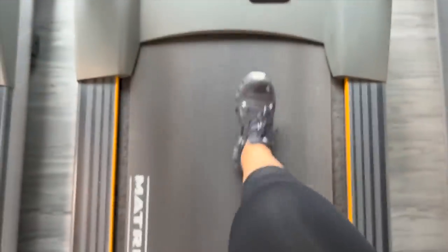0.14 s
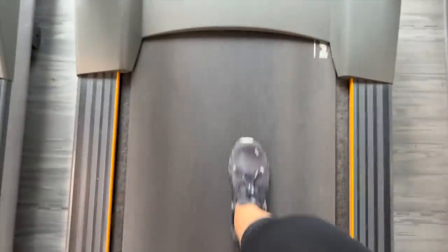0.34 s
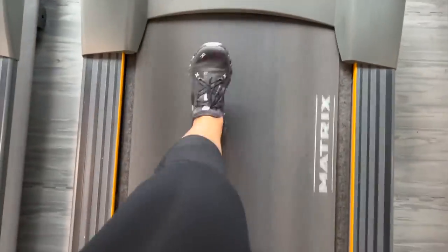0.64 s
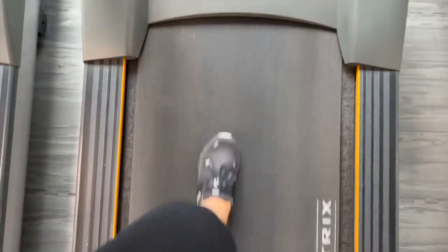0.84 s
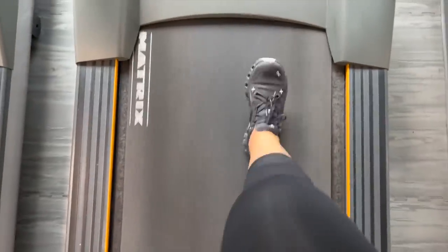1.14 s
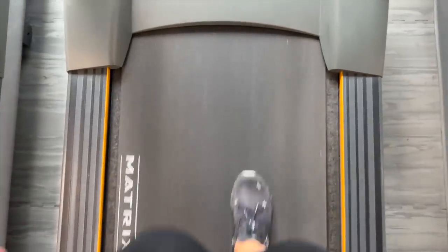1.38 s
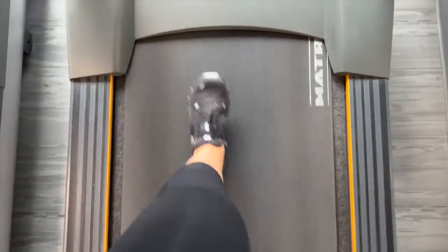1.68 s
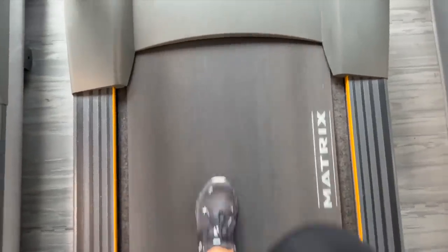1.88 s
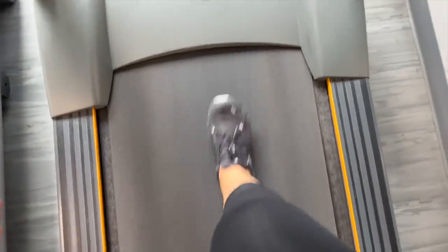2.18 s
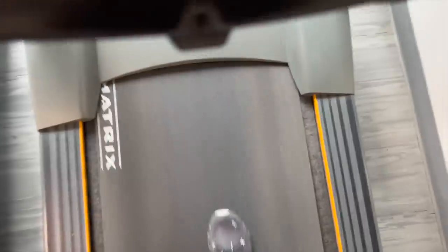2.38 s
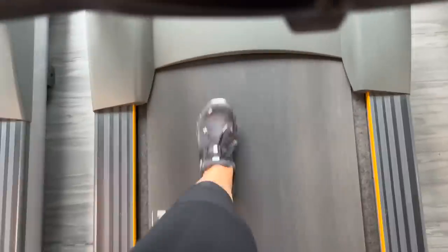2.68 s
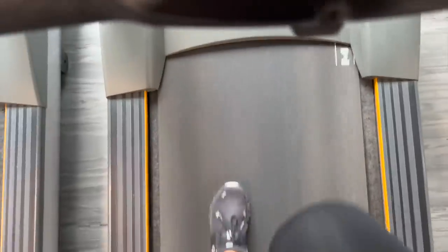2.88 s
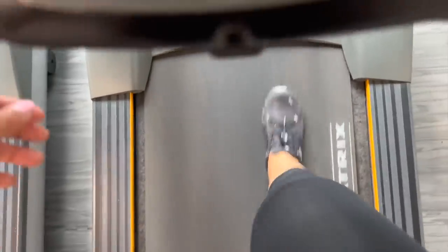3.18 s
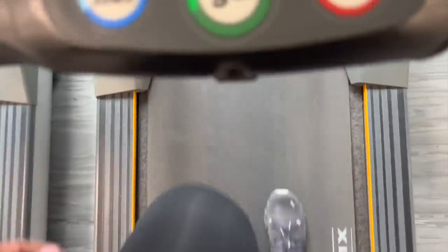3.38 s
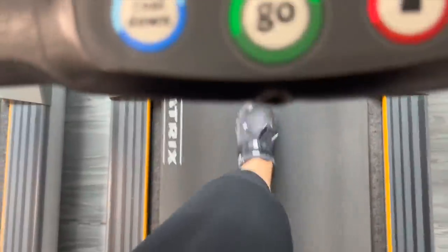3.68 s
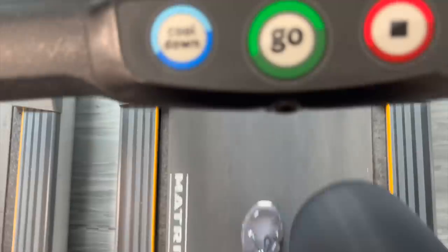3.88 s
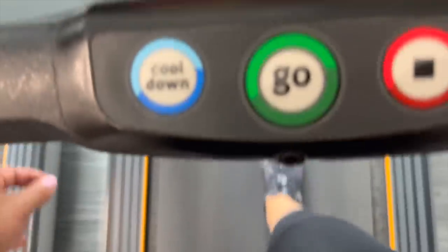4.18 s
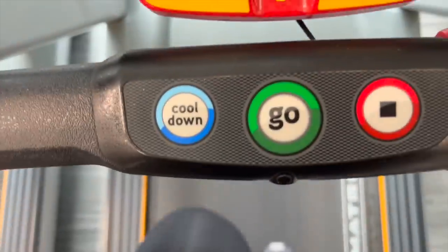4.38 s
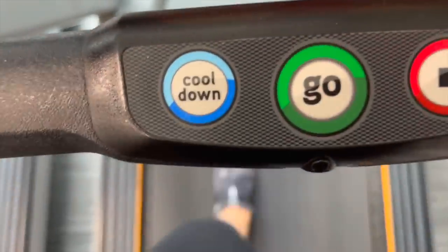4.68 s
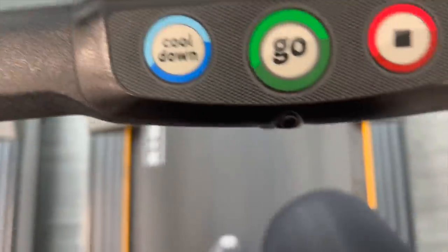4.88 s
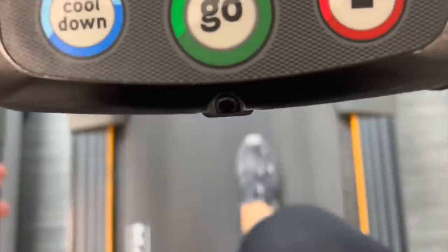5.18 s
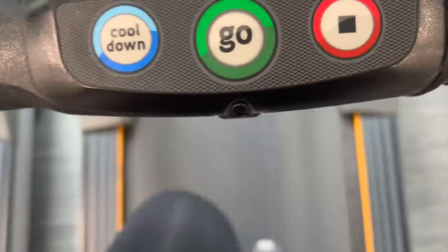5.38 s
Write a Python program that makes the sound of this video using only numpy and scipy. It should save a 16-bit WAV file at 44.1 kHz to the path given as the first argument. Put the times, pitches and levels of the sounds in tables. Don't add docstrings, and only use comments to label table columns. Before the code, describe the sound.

Eleven even jogging steps strike a treadmill deck, each a double slap with a hollow knock, a loose flutter and a low bump through the frame. Underneath, the belt hisses and scrapes, rollers rumble and the motor whines, sagging slightly after each landing. One distant soft metal clink occurs midway. Close stereo pickup near the belt, with a short dull indoor echo; the machine keeps running to the end.

```python
import sys
import numpy as np
from scipy import signal
from scipy.io import wavfile
from scipy.ndimage import uniform_filter1d

SR = 44100
rng = np.random.default_rng(int(sys.argv[2]) if len(sys.argv) > 2 else 0)


def dump(signal):
    limited = np.clip(np.atleast_2d(signal).T, -1, 1)
    pcm = np.round(limited * 32767).astype(np.int16)
    wavfile.write(sys.argv[1], SR, pcm)


def elevation(decibels):
    levels = np.asarray(decibels, float)
    return 10 ** (levels / 20)


N = 244332
TIME = np.arange(N) / SR

# [peak t/s, peak level/dB, pitch f/Hz, click level/dB]
SOLES = [(0.2468, -8, 668, -37), (0.7252, -7, 565, -28.5), (1.2174, -9.1, 664, -35),
         (1.7077, -13.3, 626, -34), (2.1975, -13.3, 585, -29), (2.6819, -13.3, 630, -34),
         (3.169, -11.2, 729, -35), (3.6523, -24, 589, -37), (4.1378, -12.2, 619, -39),
         (4.6312, -13.3, 619, -37), (5.1273, -10.1, 611, -31)]
# [t/s, thud peak level/dB, pitch f/Hz, deck shudder level/dB]
THUDS = [(0.227, -25, 125, -26), (0.709, -10, 93, -26), (1.2, -24, 91, -28), (1.7, -1, 104, -29.5),
         (2.189, -26, 127, -31.5), (2.667, -2.5, 90.5, -28.5), (3.148, -5, 94.2, -30.5),
         (3.612, -2, 120, -39), (4.118, -1, 80.5, -28.5), (4.612, -3, 76.6, -28.5), (5.097, -3, 97, -27.5)]


def slaps():
    # [peak t/s, peak level/dB, pitch f/Hz, click level/dB]
    heel_strikes = [(0.2129, -12, 642, -35), (0.6884, -15, 635, -33), (1.185, -15.5, 702, -30),
                    (1.67, -23, 650, -37), (2.1568, -17.7, 650, -36), (2.6445, -13, 669, -38),
                    (3.1312, -16.6, 693, -37), (3.6045, -16.6, 623, -38), (4.1056, -17.7, 692, -33),
                    (4.621, -15.5, 610, -38), (5.087, -15.5, 712, -34)]
    # [peak t/s, peak level/dB]
    belt_flaps = [(0.2595, -9), (0.2669, -13.5), (0.2748, -25), (0.6962, -24), (0.7435, -15.5),
                  (0.7546, -16), (1.2375, -10), (1.2505, -25), (1.7133, -18.5), (2.1633, -13),
                  (2.1767, -18), (2.2095, -23), (2.6931, -15), (2.7038, -15), (2.7219, -28),
                  (4.0616, -17.5), (4.0857, -19), (4.1452, -18), (4.1581, -17.5), (4.6373, -19.5),
                  (4.6453, -14), (4.6854, -16.5), (5.1456, -20)]
    heels = [(s, db, hz, 0.0035, click_db, 1) for s, db, hz, click_db in heel_strikes]
    soles = [(s, db, hz, 0.0047 * (640 / hz) ** 2, click_db, -2.5) for s, db, hz, click_db in SOLES]
    sole_s, _, sole_hz, _ = np.transpose(SOLES)
    flaps = []
    for s, db in belt_flaps:
        pitch_shift, side = rng.uniform(-1, 1, 2)
        hz = 0.93 * np.interp(s, sole_s, sole_hz) + 25 * pitch_shift
        flaps.append((s, db, hz, 0.0074, -36, 3 * side))
    return heels + soles + flaps


def slap(db, hz, length, click_db, pan_db):
    # [f/Hz, level/dB, decay by 60 dB/s]
    deck_modes = [(546, -19, 0.068), (593, -38, 0.09), (1155, -14.5, 0.017), (1830, -14, 0.0055)]
    t = np.arange(SR // 8) / SR - 1 / 100
    spread = np.where(t < 0, 0.6, 1.1) * length
    pop = np.cos(2 * np.pi * (hz * t + rng.random())) * np.exp(-2.6 * (t / spread) ** 2)
    after = np.maximum(t + length / 2, 0)
    ring = sum(elevation(d - 60 * after / decay) * np.sin(2 * np.pi * f * after) for f, d, decay in deck_modes)
    click_floor_db = -39
    tick_size = np.sqrt(max(elevation(click_db) ** 2 - elevation(click_floor_db) ** 2, 0))
    tick_filter = signal.butter(1, (1200, 9000), "bandpass", fs=SR)
    a, b = signal.lfilter(*tick_filter, rng.standard_normal((2, len(t))))
    tick = 1.2 * tick_size * ports(a, 0.86 * b) * elevation(-60 * after / 0.021) * (after > 0)
    pan = elevation([[pan_db / 2], [-pan_db / 2]])
    return elevation(db - 0.3) * (pop + ring) * pan + tick


def thud(db, hz):
    t = np.arange(SR // 5) / SR
    return elevation(db - 5.5 - 60 * t / 0.12) * (1 - np.exp(-t / 0.014)) * np.sin(2 * np.pi * hz * t)


def shudder():
    # [f/Hz, level/dB per Hz]
    rattle = [(180, -52), (300, -10), (460, -12.5), (603, 1), (778, 10), (1230, -8.5), (1480, -6),
              (2540, -16), (9000, -53), (11700, -76), (19800, -120)]
    swell = sum(elevation(db) * np.exp(-((TIME - s - 0.015) / 0.043) ** 2) for s, _, _, db in THUDS)
    return swell * noise(rattle, rattle, size=256, patchy_db=2, flicker_db=2.5, difference_db=-3.0)


def load():
    build_s, let_go_s = 0.13, 0.033
    return sum(np.exp(-abs(TIME - s) / np.where(TIME < s, build_s, let_go_s)) for s, *_ in SOLES)


def rollers():
    # [f/Hz, level/dB per Hz]
    low_sum = [(12, -49), (20, -25.5), (76, -5), (152, -0.5), (227, -9), (329, -4), (430, -3), (500, -12),
               (602, -4), (688, -10.5), (813, -8.5), (1100, -44.5), (1430, -62), (2420, -120)]
    low_difference = [(12, -60), (20, -29), (114, -17), (171, 2), (252, -8.5), (364, 1), (500, -3),
                      (622, 4.5), (1100, -5.5), (1430, -54), (2420, -120)]
    both = noise(low_sum, low_difference, size=2048, patchy_db=0.43, flicker_db=0.38, difference_db=-14)
    rumble, roar = split(both, hz=261)
    rumble_db = -28.5 + 0.5 * TIME + 3.5 * load()
    roar_db = -32 + 3.5 * load()
    return elevation(rumble_db) * evened(rumble) + elevation(roar_db) * evened(roar)


def drag():
    # [t/s, level/dB]
    hiss_curve = [(0.0, -45), (0.17, -45.5), (0.37, -47.5), (0.55, -48.5), (1.06, -46.5), (1.42, -48),
                  (1.65, -48), (1.93, -44.5), (2.57, -47.5), (2.87, -46), (3.38, -47), (3.66, -46),
                  (3.92, -44), (4.14, -47.5), (4.47, -47.5), (4.94, -45), (5.37, -47.5), (5.54, -47)]
    level_db = column(hiss_curve, order=1)
    return level_db - level_db.mean()


def belt():
    # [f/Hz, level/dB per Hz]
    high_sum = [(530, -4.5), (900, 0), (1170, -9.5), (1270, -5), (1780, -9), (2970, -11.5), (3510, -14.5),
                (8210, -20.5), (9030, -26), (9590, -12), (10600, -11), (10900, -24.5), (11700, -21.5),
                (14600, -23), (15600, -30)]
    high_difference = [(530, -36), (900, -35), (1170, -1.5), (1500, -4.5), (2050, -11.5), (5740, -15.5),
                       (7030, -23.5), (11300, -20), (12200, -24), (12900, -82), (14200, -80),
                       (14700, -19.5), (15600, -37)]
    both = noise(high_sum, high_difference, size=512, patchy_db=1.4, flicker_db=0.55, difference_db=-1.5)
    hiss, fizz = split(both, hz=10200)
    scrape, hiss = split(hiss, hz=3200)
    flutter = uniform_filter1d(uniform_filter1d(rng.standard_normal(N), size=1400), size=1000)
    flutter_db = 0.95 * evened(flutter)
    scrape_db = -35.5 + 1.1 * drag()
    hiss_db = -36.0 + 0.82 * drag() + flutter_db / 2
    fizz_db = -33 + 0.65 * drag() + 0.4 * load() + flutter_db
    return elevation(scrape_db) * scrape + elevation(hiss_db) * hiss + elevation(fizz_db) * fizz


def rubs():
    # [t/s, level/dB, f/Hz, half length/s]
    edge_rubs = [
        (3.89, -51, 4550, 0.25),
        (2.74, -52, 4500, 0.047),
        (5.38, -51, 2500, 0.049),
        (3.76, -51, 2800, 0.039),
    ]
    total = np.zeros((2, N))
    for s, db, hz, half in edge_rubs:
        swell = elevation(db) * np.exp(-((TIME - s) / half) ** 4)
        total += swell * ports(tone(hz, 500, 1), 0.7 * tone(hz, 500, 1))
    return total


def drive():
    # [t/s, level/dB]
    hum_curve = [(0.0, -46.5), (0.48, -43), (0.54, -49.5), (1.42, -42.5), (1.82, -51), (1.94, -42),
                 (2.76, -50), (2.87, -42), (3.67, -43), (3.7, -49), (3.92, -38.5), (4.72, -48), (4.84, -39),
                 (5.14, -43.5), (5.23, -39), (5.54, -45)]
    # [t/s, level/dB]
    sing_curve = [(0.0, -58), (0.01, -52), (0.6, -55), (0.68, -54), (1.06, -51.5), (1.23, -47), (1.27, -59),
                  (1.56, -51), (1.8, -57), (2.17, -48), (2.22, -56), (2.44, -47.5), (2.61, -55.5),
                  (4.01, -47.5), (4.33, -57), (5.06, -47), (5.21, -55.5), (5.54, -45.5)]
    # [t/s, whine level/dB]
    whine_curve = [(0.0, -45), (0.11, -47), (0.49, -49.5), (0.96, -47.5), (1.16, -47.5), (1.56, -52.5),
                   (1.99, -44.5), (2.57, -47.5), (3.19, -48.5), (3.41, -54), (3.64, -48), (3.86, -41.5),
                   (4.4, -49.5), (4.98, -45.5), (5.12, -46), (5.54, -52)]
    # [multiple, level/dB, width/Hz]
    whine_orders = [(1, -5, 45), (1.5, -14, 60), (2, -16, 80), (3, -19, 300)]
    # [f/Hz, width/Hz, level/dB]
    deck_tones = [(94.2, 20, -38), (326.8, 18.5, -39), (359.5, 11, -56)]
    fan_hz = [560.5, 603.5, 14226]
    fan_db = [-39, -39, -67]
    hum = elevation(column(hum_curve, order=1)) * ports(tone(1264.5, 5, 0.22), 0.4 * tone(1264.5, 4, 0.6))
    sing = elevation(column(sing_curve, order=1)) * ports(tone(2890.4, 9, 0.36), 0.4 * tone(2890.4, 6, 0.8))
    sag_after_s, sag_width_s = 0.11, 0.06
    sag = sum(np.exp(-((TIME - s - sag_after_s) / sag_width_s) ** 2) for s, *_ in THUDS)
    hz = 1520 - 45 * sag
    level_db = column(whine_curve, order=1) + 5.0
    whine = sum(elevation(level_db + db) * ports(tone(k * hz, w, 0.8), 1.15 * tone(k * hz, w, 1))
                for k, db, w in whine_orders)
    deck = sum(elevation(db) * ports(tone(f, w, 0.58), 0.16 * tone(f, w, 1)) for f, w, db in deck_tones)
    fan = sum(elevation(db) * ports(tone(f, 8, 0.3), 0.3 * tone(f, 6, 1)) for f, db in zip(fan_hz, fan_db))
    return hum + sing + whine + deck + fan


def clink(db, hz, length):
    t = np.arange(round(2 * length * SR)) / SR
    return elevation(db) * np.sin(2 * np.pi * hz * t) * np.hanning(len(t)) * np.array([[1.2], [0.6]])


def hall(x):
    # [f/Hz, decay by 60 dB/s]
    hall_decay = [(200, 0.1), (700, 0.14), (3000, 0.1), (9000, 0.045)]
    taps = np.zeros((2, SR // 2))
    at = np.arange(300, SR // 2 - 20, 20)
    at = at + rng.integers(0, 20, (2, len(at)))
    np.put_along_axis(taps, at, rng.choice([-1., 1.], at.shape), 1)
    hz, t, z = signal.stft(taps, SR, nperseg=256)
    tail = signal.istft(z * elevation(-60 * t / read(hall_decay, hz)[:, None]), SR, nperseg=256)[1]
    return signal.fftconvolve(x, tail / np.linalg.norm(tail[0]), axes=1)[:, :N]


def noise(total, difference, size, patchy_db, flicker_db, difference_db):
    # [f/Hz, share]
    quarter_link = [(40, 0), (600, .6), (1200, .75), (1650, -.45), (3200, .45), (5000, .4), (6800, -.35),
                    (9000, -.45), (13000, .5)]
    # [f/Hz, left-right level/dB]
    tilt = [(30, -.4), (80, -1.2), (200, -1.4), (400, .5), (1200, 0), (2400, -1), (4400, .6), (15000, 0)]
    frames, hz = 4 * N // size + 5, np.fft.rfftfreq(size, 1 / SR)
    a, b, c, d, patches = rng.standard_normal((frames, len(hz), 5)).T
    patches = evened(uniform_filter1d(uniform_filter1d(patches, size=8, axis=0), size=10, axis=1))
    flicker = evened(uniform_filter1d(rng.standard_normal(frames), size=5))
    link = np.clip(read(quarter_link, hz), -1, 1)[:, None]
    common = (a + 1j * b) * elevation(read(total, hz)[:, None])
    apart = 1j * link * (a + 1j * b) + np.sqrt(1 - link ** 2) * (c + 1j * d)
    apart = apart * elevation(read(difference, hz)[:, None] + difference_db)
    lean = elevation(read(tilt, hz)[:, None] / 2)
    z = ports(common, apart) * [lean, 1 / lean] * elevation(patchy_db * patches + flicker_db * flicker)
    return evened(signal.istft(z, nperseg=size, noverlap=3 * size // 4)[1][:, :N])


def tone(hz, width, fuzz):
    r = np.exp(-np.pi * width / SR)
    a, b = rng.standard_normal((2, N))
    wander = signal.lfilter([1 - r], [1, -r], signal.lfilter([1 - r], [1, -r], a + 1j * b))
    wander = wander / np.sqrt(np.mean(abs(wander) ** 2))
    turn = np.exp(2j * np.pi * np.cumsum(hz * np.ones(N)) / SR)
    return evened((turn * (1 - fuzz + fuzz * wander)).real)


def ports(total, difference):
    return np.array([total + difference, total - difference])


def split(x, hz):
    low = signal.sosfiltfilt(signal.butter(3, hz, fs=SR, output="sos"), x)
    return low, x - low


def evened(x):
    return x / np.sqrt(np.mean(x ** 2) + 1e-20)


def read(points, hz):
    f, value = np.transpose(points)
    return np.interp(np.log(hz + 1), np.log(f + 1), value)


def column(rows, order):
    rows = np.array(rows)
    return np.interp(TIME, rows[:, 0], rows[:, order])


def add(mix, s, sound):
    part = mix[..., round(s * SR):][..., :sound.shape[-1]]
    part += sound[..., :part.shape[-1]]


def ragged(total):
    # [usual f/Hz, typical jump/Hz, step/Hz]
    band_edges = [(9020, 62, 170), (11250, -150, 170), (15750, -330, 170)]
    hz, _, z = signal.stft(total, SR, nperseg=2048, noverlap=1536)
    frames = z.shape[1]
    jumps = rng.exponential(1, (frames // 4 + 1, 3)).clip(0, 3.5)
    jumps = np.repeat(jumps, 4, axis=0)[:frames].T
    low, high, top = (edge + np.sign(size) * step * np.floor(abs(size) * jump / step + 0.3)
                      for (edge, size, step), jump in zip(band_edges, jumps))
    keep = (hz[:, None] < low) | ((hz[:, None] > high) & (hz[:, None] < top))
    return signal.istft(z * keep, SR, nperseg=2048, noverlap=1536)[1][:N]


def scene():
    # [peak t/s, peak level/dB, f/Hz, length/s]
    far_clinks = [
        (3.07, -33.5, 1720, .02),
    ]
    feet, weight = np.zeros((2, N)), np.zeros(N)
    for s, *row in slaps():
        add(feet, s - 1 / 100, slap(*row))
    for s, db, hz, length in far_clinks:
        add(feet, s - length, clink(db, hz, length))
    for s, db, hz, _ in THUDS:
        add(weight, s, thud(db, hz))
    return feet + elevation(-11) * hall(feet) + weight + shudder() + rollers() + belt() + rubs() + drive()


def band_limit(x):
    return signal.sosfilt(signal.butter(12, 15800, fs=SR, output="sos"), x)


def record(dry):
    total, difference = (dry[0] + dry[1]) / 2, (dry[0] - dry[1]) / 2
    gap = signal.butter(4, (12400, 14600), "bandstop", fs=SR, output="sos")
    difference = signal.sosfiltfilt(gap, difference)
    total = ragged(split(total, hz=24)[1])
    difference = signal.sosfiltfilt(signal.butter(8, 15800, fs=SR, output="sos"), difference)
    return band_limit(ports(total, difference))


dry = scene()
out = record(dry)
dump(out)
```